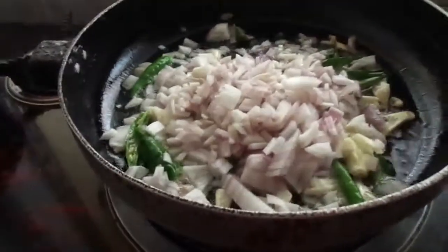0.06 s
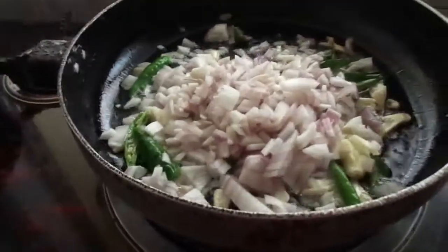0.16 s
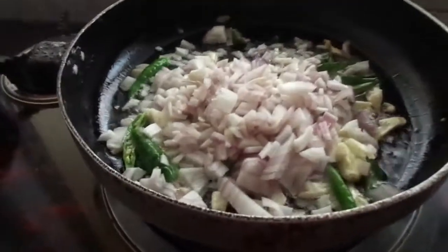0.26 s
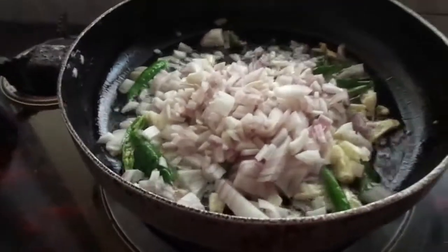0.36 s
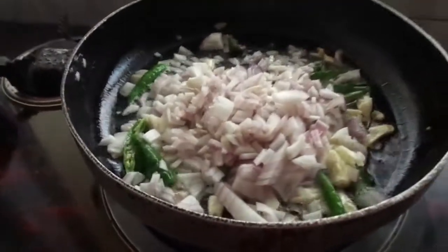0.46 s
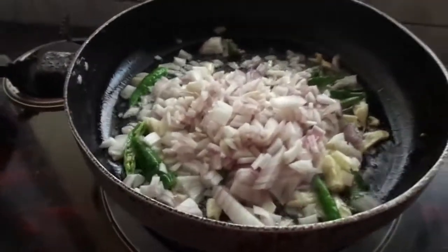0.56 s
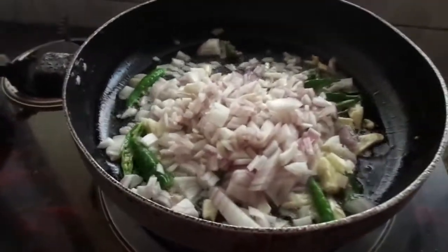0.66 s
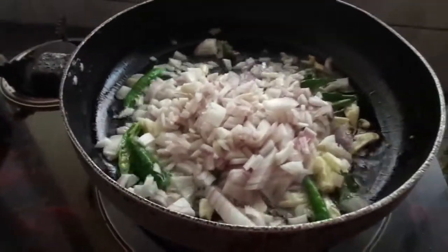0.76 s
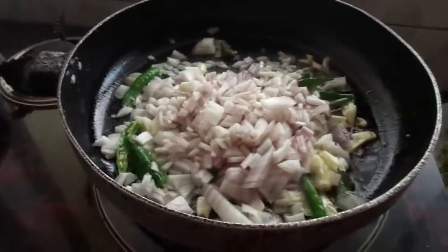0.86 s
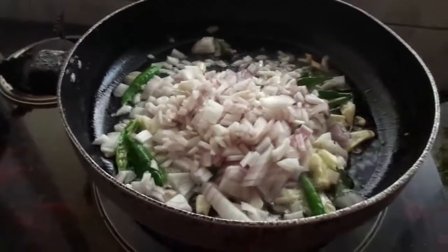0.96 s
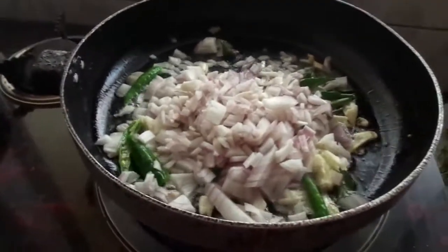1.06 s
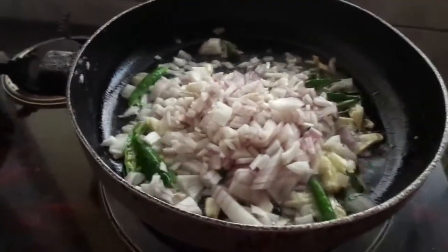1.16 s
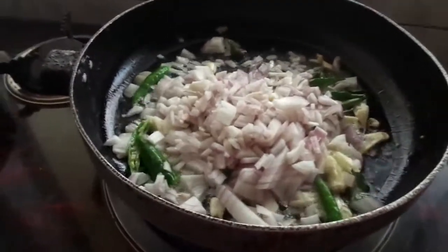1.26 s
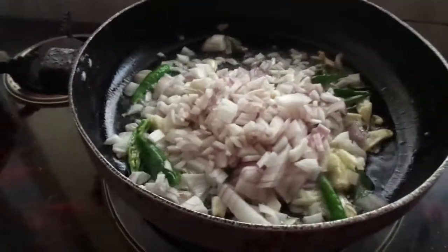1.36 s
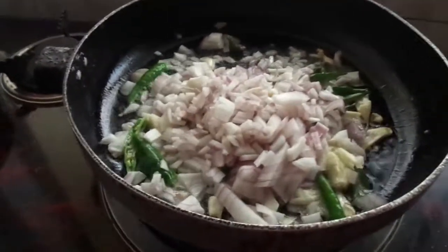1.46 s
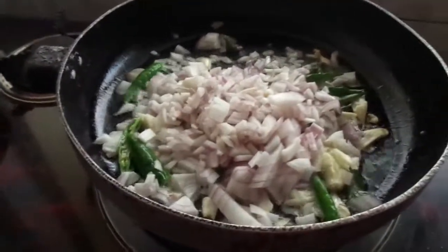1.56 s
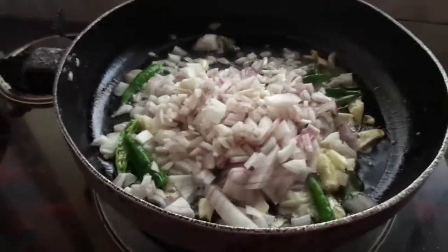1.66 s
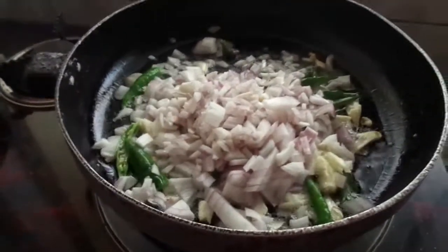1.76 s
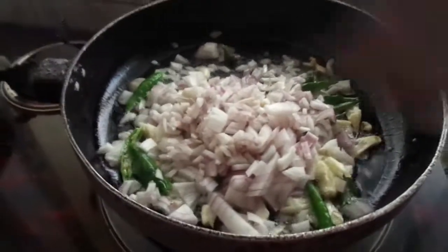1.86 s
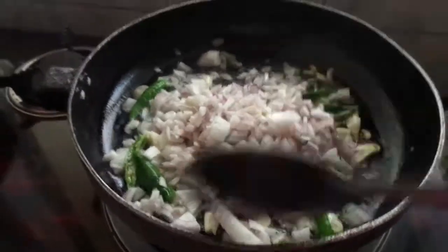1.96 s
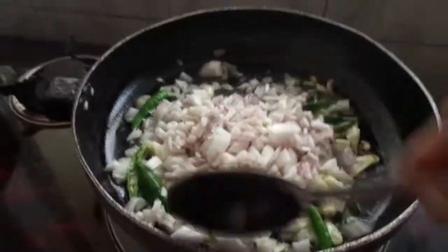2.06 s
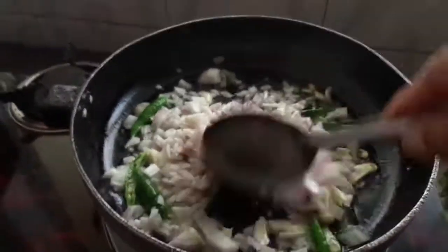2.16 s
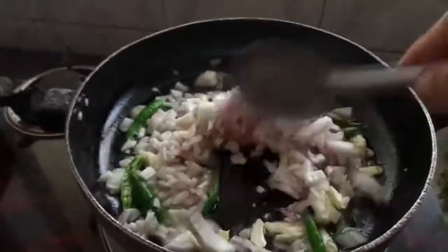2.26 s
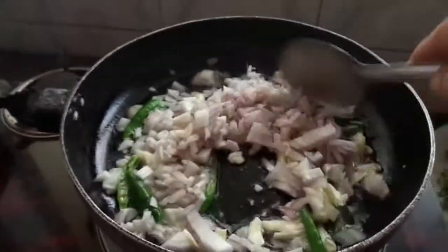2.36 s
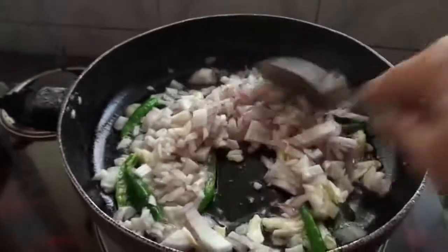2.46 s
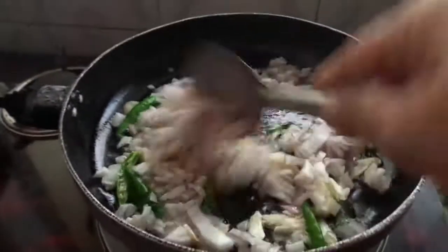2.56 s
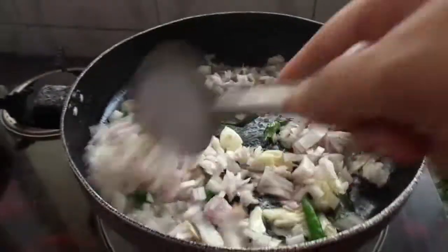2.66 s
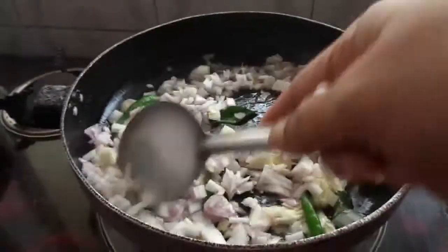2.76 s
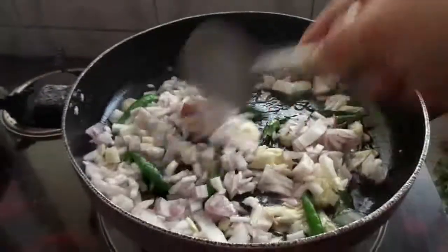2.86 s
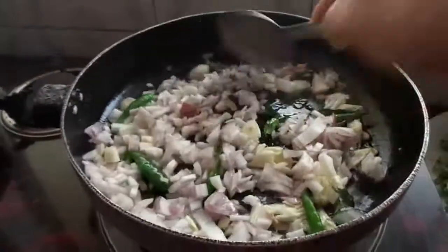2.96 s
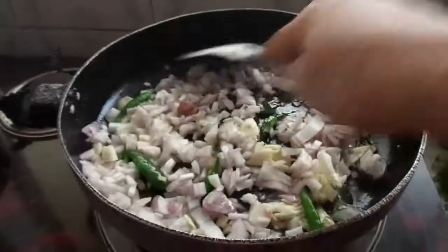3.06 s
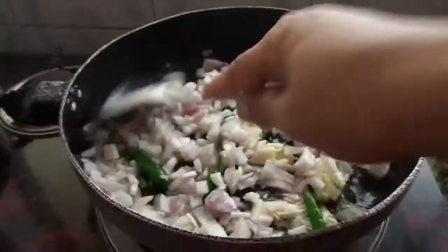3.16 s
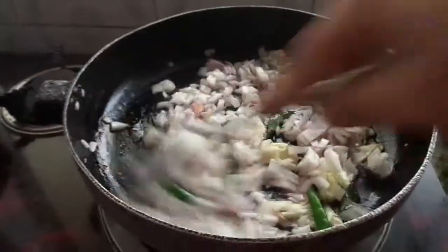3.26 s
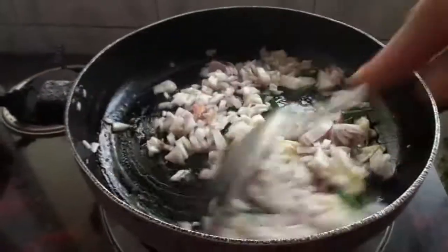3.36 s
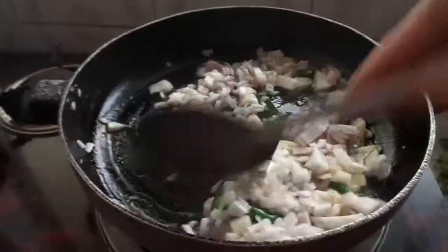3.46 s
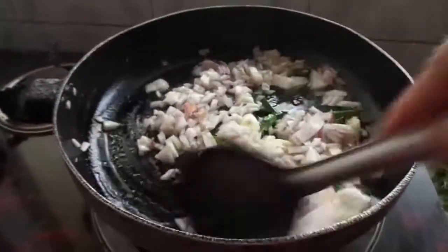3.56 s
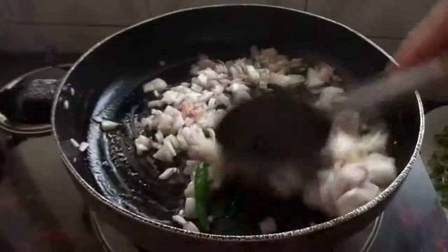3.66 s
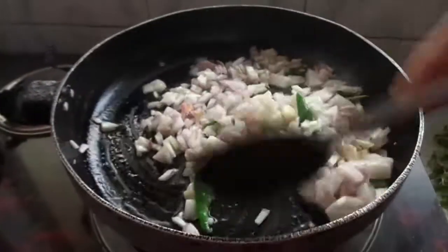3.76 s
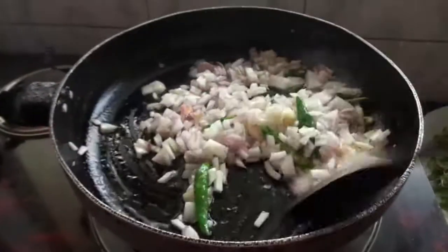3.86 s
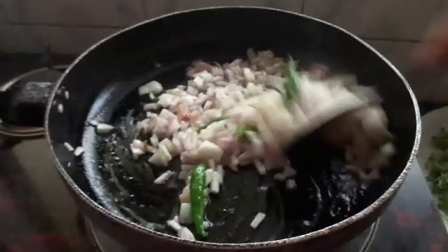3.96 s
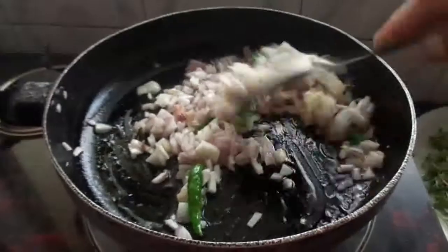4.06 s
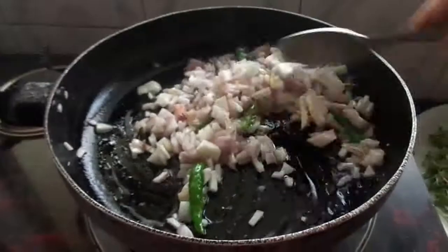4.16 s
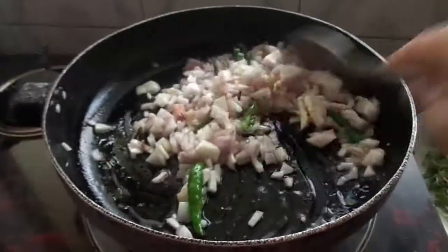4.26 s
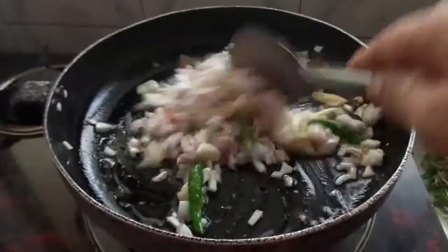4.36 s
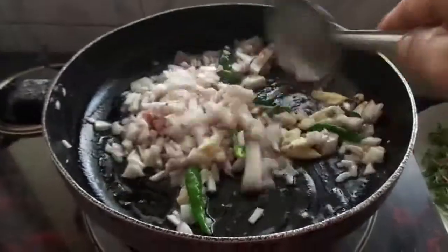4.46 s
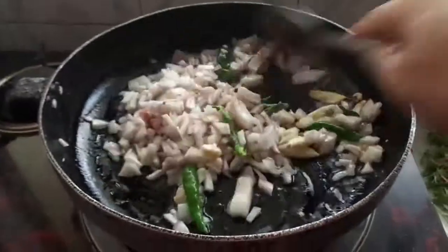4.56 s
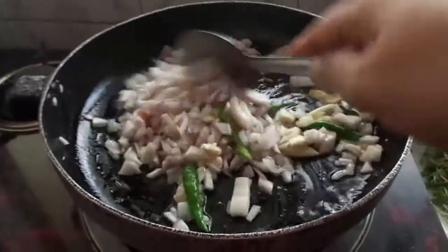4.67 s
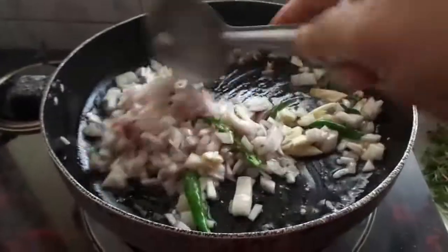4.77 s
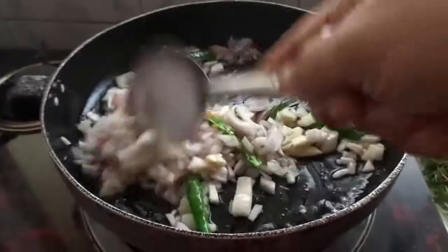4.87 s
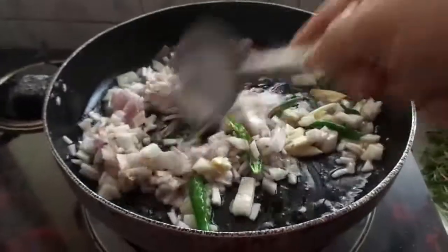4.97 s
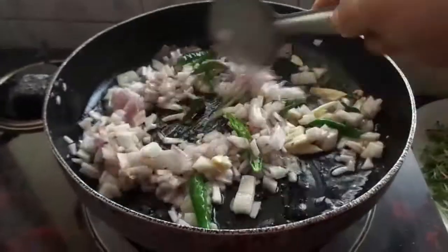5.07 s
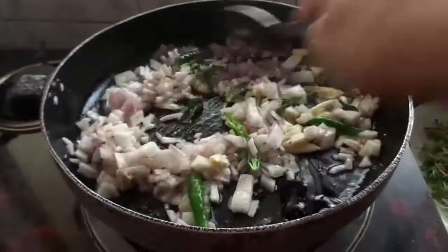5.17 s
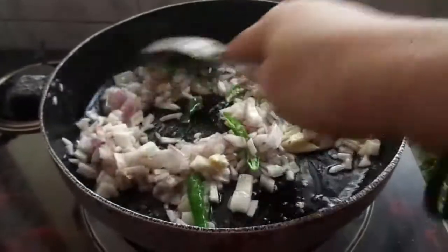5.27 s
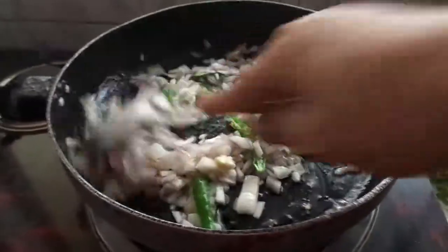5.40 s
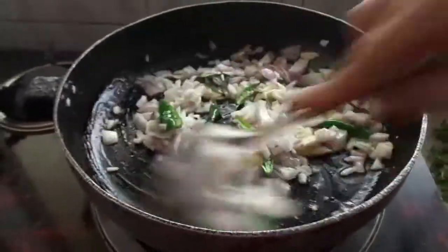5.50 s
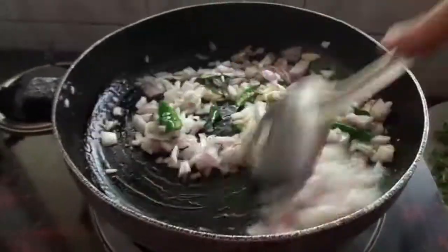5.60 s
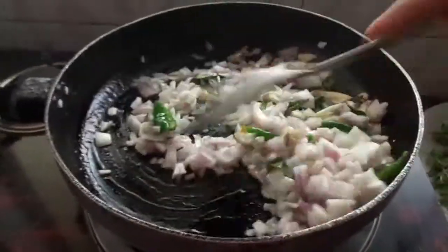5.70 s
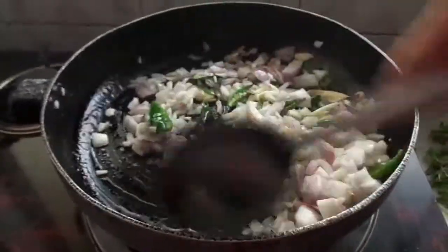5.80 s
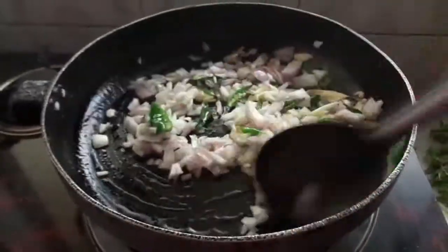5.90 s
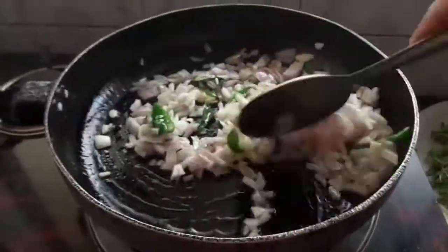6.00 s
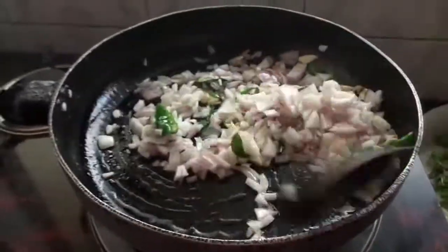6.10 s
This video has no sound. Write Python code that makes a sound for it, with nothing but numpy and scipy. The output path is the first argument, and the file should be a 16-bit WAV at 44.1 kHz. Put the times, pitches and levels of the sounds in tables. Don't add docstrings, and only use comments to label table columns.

```python
import sys
import numpy as np
from scipy import signal
from scipy.io import wavfile
from scipy.ndimage import uniform_filter1d

SR = 44100
rng = np.random.default_rng(int(sys.argv[2]) if len(sys.argv) > 2 else 0)


def decibels_to_gain(level_db):
    exponent = np.asarray(level_db, float) / 20
    return 10 ** exponent


def file_out(sig):
    cols = np.atleast_2d(sig).T
    lim = np.clip(cols, -1, 1)
    pcm = np.round(lim * 32767).astype(np.int16)
    wavfile.write(sys.argv[1], SR, pcm)


N = 270641


def evened(x):
    return x / np.sqrt(np.mean(x ** 2) + 1e-20)


def read(points, hz):
    f, value = np.transpose(points)
    return np.interp(np.log(hz + 1), np.log(f + 1), value)


def add(mix, s, sound):
    part = mix[round(s * SR):][:len(sound)]
    part += sound[:len(part)]


def resonate(x, hz, width):
    turn = np.exp(2j * np.pi * np.cumsum(hz * np.ones(len(x))) / SR)
    r = np.exp(-np.pi * width / SR)
    smooth = signal.lfilter([1 - r], [1, -r], x / turn + 1e-18)
    return 2 * (turn * smooth).real


def ring(modes, spread_db=0., seconds=0.23):
    t = np.arange(round(seconds * SR)) / SR
    out = np.zeros(len(t))
    luck_db = spread_db * rng.standard_normal(len(modes))
    for (hz, db, t60), extra_db in zip(modes, luck_db):
        out += decibels_to_gain(db + extra_db - 60 * t / t60) * np.sin(2 * np.pi * hz * t)
    return out


def noise(colour_db, size, patchy_db):
    hop = size // 4
    frames, hz = N // hop + 5, np.fft.rfftfreq(size, 1 / SR)
    a, b, patches = rng.standard_normal((frames, len(hz), 3)).T
    patches = uniform_filter1d(patches, size // 64, axis=0)
    patches = evened(uniform_filter1d(patches, size=8, axis=1))
    z = (a + 1j * b) * decibels_to_gain(colour_db(hz[:, None]) + patchy_db * patches)
    return signal.istft(z, nperseg=size, noverlap=size - hop)[1][:N]


def taps(length, per_s, spread_db, most=4):
    chance, luck, sign = rng.random((3, length))
    size = decibels_to_gain(spread_db * np.minimum(-np.log(luck + 1e-9), most))
    return (chance < per_s / SR) * np.sign(sign - .5) * size


def bubble(hz, cycles, glide):
    turns = np.arange(round(5 * cycles / hz * SR) + 4) * hz / SR
    wave = np.sin(2 * np.pi * (turns + glide * turns ** 2 / cycles)) * np.exp(-turns / cycles)
    return wave / abs(wave).max()


# [f/Hz, width/Hz, level/dB]
BOWL_AIR = [(1350, 90, -3.5), (1855, 170, -8), (3520, 130, -11.5)]


def hollow(x):
    return sum(decibels_to_gain(db) * signal.lfilter(*signal.iirpeak(hz, hz / width, SR), x)
               for hz, width, db in BOWL_AIR)


# [t/s, level/dB]
FRYING = [(0.0, -35.5), (0.48, -36.5), (1.28, -37), (2.15, -37.5), (2.34, -35), (2.61, -33.5),
          (3.07, -33.5), (3.89, -32.5), (4.97, -33.5), (5.36, -32), (5.7, -33.5), (6.13, -32.5)]
# [f/Hz, level/dB per Hz]
FIZZ_COLOUR = [(180, -48), (300, -28.5), (640, -7.5), (785, -7), (1180, -3), (1320, -2), (2820, -4.5),
               (3980, -3), (11600, -5.5), (12400, -4), (13000, -8.5)]
# [t/s, half width/s, level/dB]
FLARES = [(.2, 0.028, 2), (1.08, 0.051, 2.5), (1.28, 0.042, 2.5), (1.72, 0.076, 1), (2.5, 0.035, 2.5),
          (2.8, .06, 1), (3.3, 0.046, 0.5), (4.02, 0.049, 1.5), (4.28, 0.056, 1), (4.7, 0.087, 1.5),
          (5.7, .05, 0)]


def fizz():
    def colour_db(hz):
        return read(FIZZ_COLOUR, hz) - 0.13 * np.log2(hz / 5000 + 0.0091)

    blur = evened(noise(colour_db, size=256, patchy_db=1.5))
    clumps = decibels_to_gain(3. * evened(uniform_filter1d(rng.standard_normal(N), size=700)))
    bursts = clumps ** 0.99 * taps(N, 1500., 5.8, most=3.0)
    kind = rng.integers(0, 14, size=N)
    crackle = np.zeros(N)
    for k, hz in enumerate(np.linspace(2500, 12500, num=14)):
        crackle += np.convolve(bursts * (kind == k), bubble(hz, rng.uniform(0.4, 3.6), 0.144))[:N]
    direct = blur * clumps ** 0.14 + decibels_to_gain(-6.5) * evened(crackle)

    t = np.arange(N) / SR
    s, level_db = np.transpose(FRYING)
    flare_db = sum(db * np.exp(-((t - at) / half) ** 2) for at, half, db in FLARES)
    return decibels_to_gain(np.interp(t, s, level_db) + flare_db + 0.07) * (direct + decibels_to_gain(-1) * hollow(direct))


# [t/s, peak level/dB, f/Hz, ring of the bowl air/dB]
SPITS = [(0.0326, -13, 8900, -27), (0.137, -19.5, 2550, -12), (0.2025, -12, 5100, -9),
         (0.3852, -17, 4000, -24), (0.4746, -13.5, 8100, -13.5), (0.707, -12, 10400, -27),
         (0.7959, -11.5, 5300, -14), (1.042, -21, 2470, -9), (1.1033, -22, 6080, -29),
         (1.3068, -26, 5160, 1), (1.4382, -12.5, 8000, -11), (1.6775, -21.5, 3590, -4),
         (1.7151, -16.5, 3720, -14), (1.759, -17, 7040, -29), (1.778, -17, 5930, -27),
         (2.189, -18, 3750, -21), (2.256, -12.5, 10200, -31), (2.7699, -12, 7840, -17),
         (3.306, -16.5, 5100, -10), (3.7763, -15.5, 5430, -10), (4.001, -11, 8200, -27),
         (4.055, -14.5, 4000, -15), (4.2786, -16, 7540, -4.5), (4.5243, -6.5, 6000, -36),
         (4.5321, -12.5, 5650, -15), (4.6977, -16, 6060, -26), (4.7437, -11, 2700, -9.5),
         (4.7444, -3.5, 9600, -23), (5.105, -11.5, 8800, -19), (5.7194, -18, 4500, -10)]


def spits():
    out = np.zeros(N)
    boom = hollow(np.eye(1, 900)[0])
    boom /= abs(boom).max()
    for s, db, hz, ring_db in SPITS:
        snap = decibels_to_gain(ring_db + 3.5) * boom
        add(snap, 0, bubble(hz, 2.46, 0.32))
        add(snap, 0, decibels_to_gain(-7.) * bubble(9500, .9, .1))
        add(snap, .0005, decibels_to_gain(-4) * bubble(1.48 * hz, 1.0, 0.046))
        add(out, s + 0.0014, decibels_to_gain(db - 0.5) * snap)
    return out


# [f/Hz, level/dB, t60/s]
PAN_DEEP = [(270, -1.5, 0.55), (340, 1, 0.3), (378, 2.5, 0.15)]
PAN_DULL = [(490, -23, 0.035), (587.6, 6.5, 0.13), (644, 9, 0.12), (740, -3, .05)]
PAN_MAIN = [(910, -45, 0.27), (975, -35, 0.63), (1096, 8, 0.63), (1289, 19, 0.2), (1400, 20, 0.055),
            (1487, 13, 0.068)]
PAN_HARD = [(1756, 19, 0.032), (1845, 17.5, 0.092), (2060, 13, 0.14), (2200, -2, 0.19), (2280, -5, 0.094),
            (2400, -26, 0.056), (2660, -63, 0.016), (3330, -15, 0.099), (3750, -12, 0.022),
            (4580, 1.5, 0.036), (5160, 4.5, 0.15)]
# [t/s, peak level/dB, dull part/dB, hard part/dB, crack/dB]
KNOCKS = [(2.106, -7, -47, -23, -29), (3.0293, -1, -45, -9, -17), (3.035, -12, 5, 0, -16),
          (3.481, -7.5, -41, -8, -29), (3.809, -17.5, -3, -6, -16), (3.835, -23, -16, 7, -9),
          (3.845, -13, -10, -9, -13), (3.857, -10, -27, -10, -33), (4.578, 0, -41, -8, -17),
          (4.615, -14, -34, 0, -18), (5.199, -10.5, -17, -20, -31), (5.324, -10, 7.5, 4, -15),
          (5.326, -6, 0, -18, -30), (5.815, -19, -1, -14, -21), (6.097, -10.5, -16, -5.5, -22)]


def knocks():
    out, blow = np.zeros(N), signal.windows.hann(7)
    groups = ([*PAN_DULL, *PAN_DEEP], PAN_MAIN, PAN_HARD)
    for s, db, dull_db, hard_db, crack_db in KNOCKS:
        parts = [np.convolve(ring(modes, spread_db=2.5), blow) for modes in groups]
        t = np.arange(len(parts[0])) / SR
        choke = 0.08 + np.exp(-t / 0.01)
        dull, main, hard = (p * choke / abs(p * choke).max() for p in parts)
        body = decibels_to_gain(dull_db + 2) * dull + main + decibels_to_gain(hard_db + 1.5) * hard
        crack = resonate(rng.standard_normal(len(t)), 3050, 1100)
        crack = resonate(crack, 3050, 1100) * np.exp(-t / .005)
        crack /= abs(crack).max()
        add(out, s + 0.00045, -decibels_to_gain(db) * (body + decibels_to_gain(crack_db + 7) * crack))
    return out


SWELL_DB = 20
DEEP_DB, DULL_DB, HARD_DB = -24.5, -9, -5
DEEP_PER, DULL_PER, HARD_PER = 2.48, 0.94, 0.058
GRIT_DB_PER_OCTAVE = 1.4


def scrape(jerks, at, db, rise, fall, weight_db):
    first = round((at - 1.5 * rise) * SR)
    jerks = jerks[first:round((at + 1.5 * fall) * SR)]
    t = (first + np.arange(len(jerks))) / SR - at
    low_hz = 606 + 420 * t
    main_hz = 1340. - 1200 * np.clip(t, 0, .1)

    def band(hz, width):
        return evened(resonate(resonate(jerks, hz, width), hz, width))

    groups = (PAN_DEEP, PAN_DULL, PAN_MAIN, PAN_HARD)
    deep, dull, main, hard = (evened(signal.oaconvolve(jerks, ring(modes, spread_db=2.))[:len(t)])
                              for modes in groups)
    dull = evened(dull + 2.3 * band(low_hz, 84) + 0.55 * band(790, 330))
    main = evened(main + 1.38 * band(main_hz, 122) + 1.06 * band(1078, 750))
    hard = evened(hard + 1.3 * band(2250, 900))

    grit_db = GRIT_DB_PER_OCTAVE * np.log2(rise / 0.15)
    sound = main + decibels_to_gain(DEEP_DB + DEEP_PER * weight_db) * deep
    sound += decibels_to_gain(DULL_DB + DULL_PER * weight_db) * dull
    sound += decibels_to_gain(HARD_DB + HARD_PER * weight_db + grit_db) * hard
    drag = decibels_to_gain(db - SWELL_DB * np.maximum(-t / rise, t / fall))
    return first / SR, drag * sound


# [t of most pressure/s, drag level/dB, rise/s, fall/s, weight on the pan/dB]
PUSHES = [(2.114, -28, 0.019, 0.074, -1), (2.49, -38.5, 0.071, 0.14, 5), (3.045, -29, 0.0088, 0.27, 3.5),
          (3.193, -31, 0.21, 0.095, -1), (3.289, -36.5, 0.13, 0.053, -8),
          (3.484, -16.5, 0.0065, 0.075, 3.5), (3.559, -33.5, 0.045, 0.11, 9.5), (3.812, -28, .004, 0.2, 7),
          (3.865, -29, 0.075, .2, -15), (3.965, -32.5, 0.13, 0.011, -7), (4.03, -50, 0.053, 0.028, -13),
          (4.586, -16, 0.018, 0.084, -0.5), (4.613, -24, 0.049, 0.027, -8.), (5.208, -31, 0.0062, 0.041, 8),
          (5.338, -27, 0.012, 0.18, 7), (5.5, -24.5, .16, 0.083, -14), (5.829, -26.5, 0.018, 0.067, 7),
          (5.89, -33, 0.071, .07, 9.5), (6.1, -19, 0.0035, 0.13, -0.5)]


def scrapes():
    out = np.zeros(N)
    jerks = taps(N, 6000., 3.5, most=3)
    for push in PUSHES:
        add(out, *scrape(jerks, *push))
    return out


# [t/s, peak level/dB, f/Hz, t60/s]
GLINTS = [(.4, -43, 635, 0.28), (.41, -44.5, 539, .25), (.44, -42.5, 740, 0.2), (1.048, -31, 2320, 0.059),
          (1.166, -32.5, 2900, 0.093), (2.485, -25.5, 975, 0.11), (3.04, -25, 5170, 0.05),
          (3.112, -18, 2060, 0.066), (3.183, -10, 1400, 0.025), (3.482, -16.5, 3360, 0.084),
          (3.483, -22.5, 7080, 0.056), (3.535, -39, 6780, 0.045), (3.575, -28, 3330, 0.11),
          (3.95, -19, 648, 0.11), (3.816, -21, 1864, .12), (4.578, -14.5, 4490, 0.03),
          (4.58, -18, 5270, .03), (3.032, -25, 4200, .04), (5.445, -15, 1340, 0.079),
          (5.472, -19, 1398, 0.062), (5.49, -8.5, 1350, 0.05), (5.816, -11.5, 1366, 0.081),
          (5.852, -22.5, 3330, 0.049), (6.1, -23, 3750, 0.068)]


def glints():
    out, t = np.zeros(N), np.arange(round(.3 * SR)) / SR
    for s, db, hz, t60 in GLINTS:
        twin = np.sin(2 * np.pi * (1.1 * hz * t + rng.random()))
        pair = np.sin(2 * np.pi * hz * t) + 0.32 * twin
        add(out, s, decibels_to_gain(db - 60 * t / t60) * pair * (1 - np.exp(-t / 0.0014)))
    return out


RATTLE_S = 1.2135
# [f/Hz, level/dB, t60/s]
LADLE_MODES = [(1908, 5, 0.095), (2490, 5, 0.046), (3350, 4, 0.071), (4700, 2.5, 0.065), (5170, 0, 0.11),
               (5900, -7, 0.046), (6780, -18, 0.043), (7080, 4, 0.15), (6900, 0, 0.11), (8200, -4, 0.063),
               (8810, 3, 0.076), (9300, 5, 0.066), (10900, 1, .07), (11780, 7, 0.096)]


def rattle():
    chatter = evened(taps(round(.11 * SR), 1800., 4., most=3))
    t = np.arange(len(chatter)) / SR
    chatter[0] = 5.5
    body = ring(LADLE_MODES)
    body[0] += 24.
    fade = decibels_to_gain(-25 - 194 * t)
    return signal.oaconvolve(chatter * fade, body / np.linalg.norm(body))


HUM_HZ, HUM_DB = 195, -65.5
SHAKE_DB, SHAKE_S = -39, 0.59
THUMP_DB, THUMP_HZ = -54, 46
# [f/Hz, level/dB per Hz]
ROAR_COLOUR = [(41, -51), (70, -29), (108, -5.5), (151, -3), (220, -19), (258, -6), (639, -2.5), (900, -9),
               (1170, -31), (1980, -120)]


def room(ladle):
    t = np.arange(N) / SR
    roar = evened(noise(lambda hz: read(ROAR_COLOUR, hz), size=2048, patchy_db=2.0))

    peak = signal.iirpeak(HUM_HZ, 9., SR)
    hum = evened(signal.lfilter(*peak, signal.lfilter(*peak, rng.standard_normal(N))))
    swell_db = 12.4 * np.exp(-((t - 1.54) / .12) ** 2)

    low_band = signal.butter(2, [55., 150.], "band", fs=SR, output="sos")
    shake = evened(signal.sosfilt(low_band, rng.standard_normal(N)))
    hold = np.exp(-1 / (SHAKE_S * SR))
    sway = np.sqrt(signal.lfilter([1 - hold], [1, -hold], ladle ** 2))

    out = decibels_to_gain(-53.5) * roar + decibels_to_gain(SHAKE_DB) * sway * shake + decibels_to_gain(HUM_DB + swell_db) * hum
    for s, db in [row[:2] for row in KNOCKS] + [(RATTLE_S, -4.)]:
        add(out, s, decibels_to_gain(db + THUMP_DB) * bubble(THUMP_HZ, 0.61, 0))
    return out


def scene():
    oil = fizz() + spits()
    ladle = knocks() + scrapes() + glints()
    add(ladle, RATTLE_S, rattle())
    no_bass = signal.butter(8, 245., "high", fs=SR, output="sos")
    mix = signal.sosfilt(no_bass, oil + ladle) + room(ladle)
    return np.array([mix, mix])


def top_cut(x):
    return signal.sosfilt(signal.butter(12, 13710, fs=SR, output="sos"), x)


def record(dry):
    low_pass = signal.firwin(401, 12550, window=("kaiser", 9), fs=SR)
    mid = np.convolve(dry[0], low_pass, "same")

    hz, t, z = signal.stft(mid, SR, nperseg=1024)
    draws = rng.random((len(t) // 3 + 1, 2))
    burst, often = np.repeat(draws, 3, axis=0)[:len(t)].T
    high = (hz > 11200) & (hz < 11800)
    apart = (burst < .16) | (high[:, None] & (often < .55))
    size = np.minimum(abs(z), 2 * np.median(abs(z), axis=1)[:, None])
    turn = np.exp(2j * np.pi * rng.random(z.shape))
    side = signal.istft(size * apart * turn * decibels_to_gain(-14.), SR, nperseg=1024)[1][:N]

    mix = np.clip([mid + side, mid - side], -1, 1) - .0007
    return top_cut(mix)


dry = scene()
out = record(dry)
file_out(out)
```